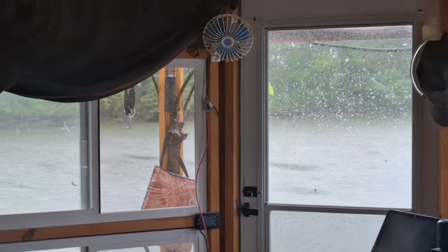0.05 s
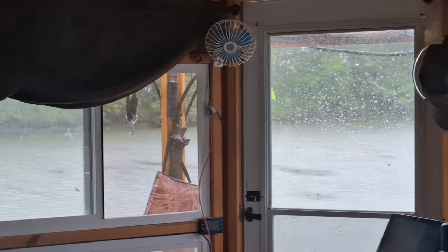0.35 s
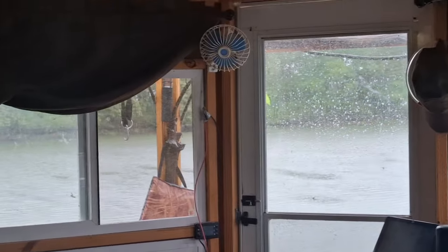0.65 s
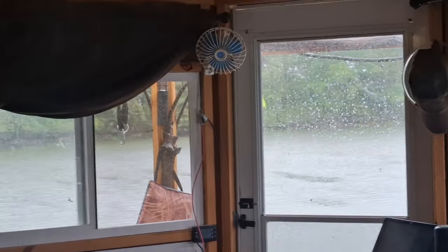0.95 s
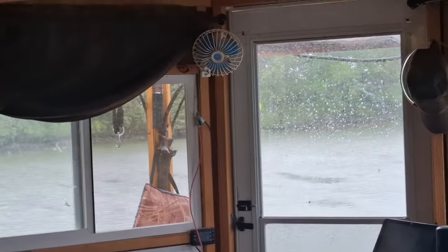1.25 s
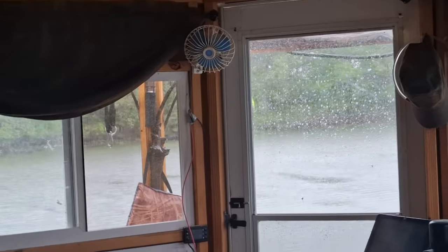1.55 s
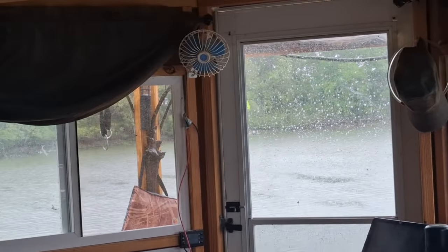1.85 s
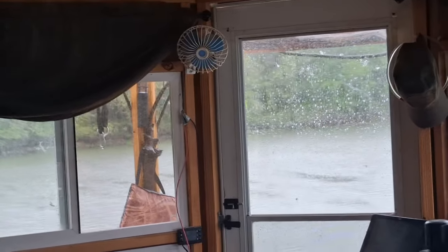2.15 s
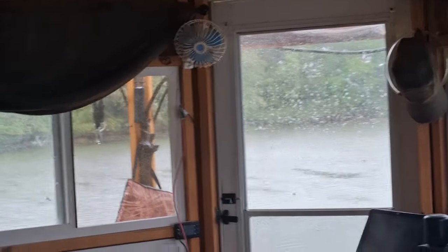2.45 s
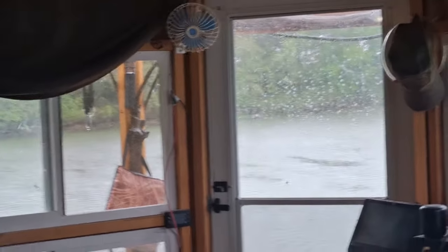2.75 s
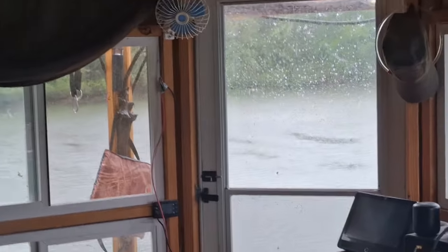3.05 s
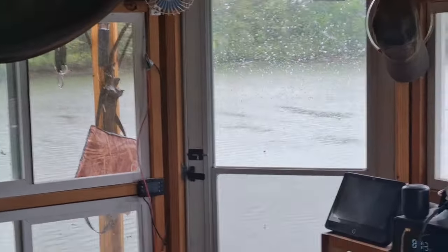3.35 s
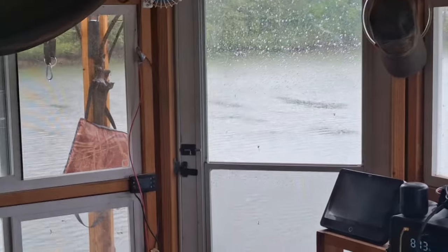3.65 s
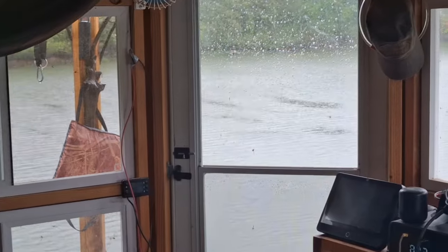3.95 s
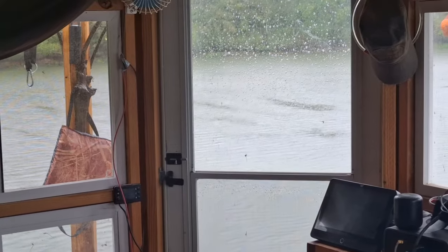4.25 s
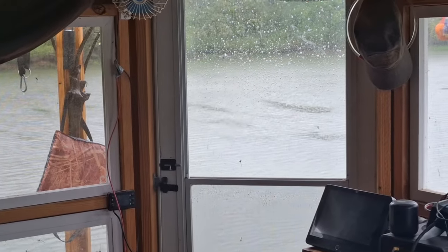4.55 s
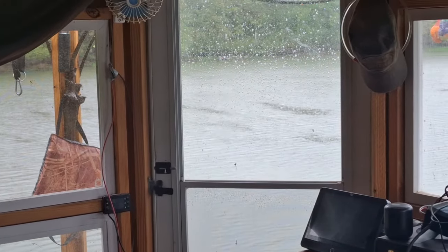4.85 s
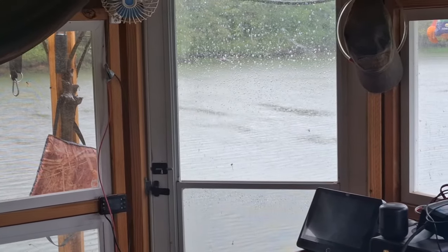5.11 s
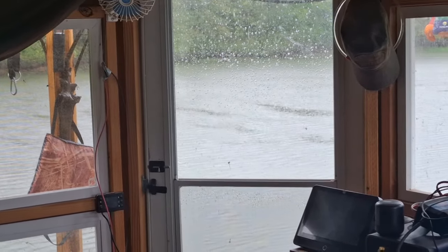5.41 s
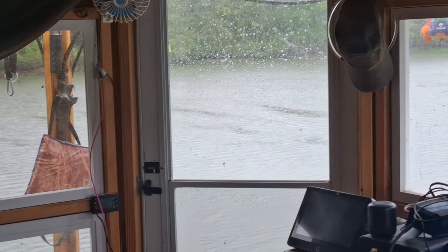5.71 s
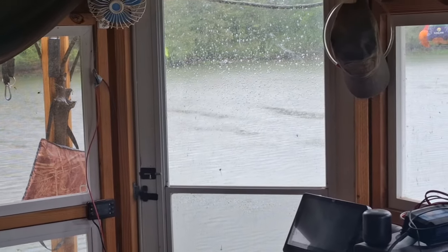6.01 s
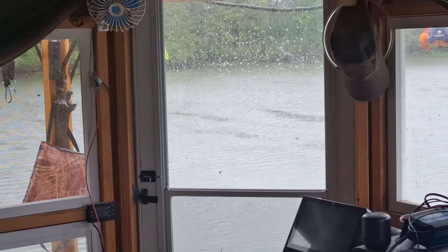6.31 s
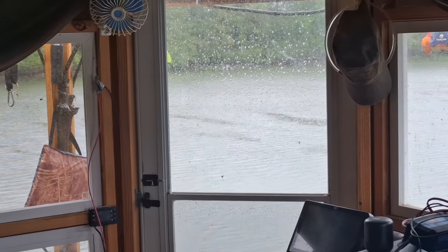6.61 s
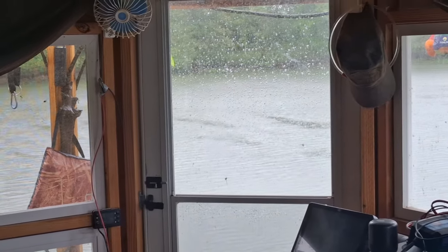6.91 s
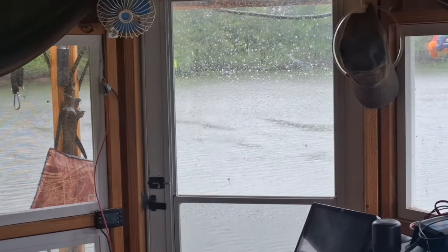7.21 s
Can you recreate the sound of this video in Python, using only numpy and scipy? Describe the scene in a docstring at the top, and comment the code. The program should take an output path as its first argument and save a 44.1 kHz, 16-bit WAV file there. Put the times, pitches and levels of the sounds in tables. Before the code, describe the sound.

A slow engine throbs with a deep, slightly uneven rumble for the whole seven seconds, heard inside a houseboat cabin. Softer, steady rain washes over the roof and ticks on the window panes, briefly stronger at the very start. At about 0.1 seconds a dull, heavy thump lands together with a sharp tap. From 0.6 to 2.8 seconds, light wooden knocks come irregularly, often in loose pairs, with soft low thumps near 1 and 2 seconds. Something slides with a short swish at about 2.6 seconds, followed at once by two more thumps. Another heavy thump with a small knock lands at 3.5 seconds. Then the engine and rain continue with scattered faint ticks. A few weaker thumps come between 6 and 7 seconds, and faint drips plink into the water around 6.5 and 6.9 seconds.

```python
"""A dull thump and light wooden knocks sound over a rumbling engine and rain, inside a houseboat's cabin.
The slow engine shakes the hull with one stroke for each turn of its shaft. Fine rain washes over the
roof, ticks on the panes and plops into the water. For the first three seconds, blows on wood come in
loose pairs and something slides briefly; now and then a heavy, soft blow sets the floor swinging."""
import sys
import numpy as np
from scipy import signal
from scipy.fft import rfft, irfft, next_fast_len
from scipy.io import wavfile
from scipy.ndimage import uniform_filter1d

SR = 44100
rng = np.random.default_rng(int(sys.argv[2]) if len(sys.argv) > 2 else 0)


def dump(signal):
    """Clip the signal to [-1, 1] and save it as 16-bit WAV at the path in sys.argv[1]."""
    limited = np.clip(np.atleast_2d(signal).T, -1, 1)
    pcm = np.round(limited * 32767).astype(np.int16)
    wavfile.write(sys.argv[1], SR, pcm)


N = 320607
TIME = np.arange(N) / SR
HIT_TIME = np.arange(16384) / SR  # seconds since a single hit

# heavy blows on the floor, which also jolt the wood: t/s, level/dB, f/Hz
THUMPS = [(0.105, -12.5, 96.5), (1.021, -20.5, 82.6), (1.956, -17, 80.7), (2.679, -23, 73),
          (2.81, -19, 101.6), (3.528, -12, 111.4), (6.067, -25.5, 87.5), (6.401, -34, 77),
          (6.989, -32, 82.5)]


def from_db(db):
    """Turn decibels into a number to multiply a sound by."""
    return 10 ** (np.asarray(db) / 20)


def curve(table):
    """Join (time, value) points with straight lines."""
    times, values = np.transpose(table)
    return np.interp(TIME, times, values)


def bell(s, half_s):
    """A smooth swell from 0 to 1 and back, centred on time s."""
    return np.exp(-((TIME - s) / half_s) ** 2)


def wander(per_s):
    """A smooth random wobble, roughly 1 in size, made from per_s random steps a second."""
    hold = max(int(SR / per_s), 1)
    steps = np.repeat(rng.standard_normal(N // hold + 1), hold)[:N]
    smooth = uniform_filter1d(uniform_filter1d(steps, hold), hold)
    return smooth / smooth.std()


def colour(x, points):
    """Make some pitches louder and others softer, following (f/Hz, level/dB) points."""
    size = next_fast_len(x.shape[-1], real=True)
    size += size % 2
    hz, db = np.transpose(points)
    bin_hz = np.maximum(np.fft.rfftfreq(size, 1 / SR), 1)
    gain = from_db(np.interp(np.log(bin_hz), np.log(hz), db))
    # let the filter ring only after a hit, never before, so that hits stay sharp
    cepstrum = irfft(np.log(gain))
    cepstrum[1:size // 2] *= 2
    cepstrum[size // 2 + 1:] = 0
    return irfft(rfft(x, size) * np.exp(rfft(cepstrum)))[..., :x.shape[-1]]


def unit(x, size=None):
    """Scale a sound so that the mean of its channels has strength (rms) 1 over the first size samples."""
    return x / np.sqrt(np.mean(x.mean(axis=0)[:size] ** 2))


def add(out, s, sound):
    """Mix a sound in at s seconds."""
    start = max(int(s * SR), 0)
    out[:, start:start + sound.shape[1]] += sound[:, :N - start]


def cabin_noise(size, apart_hz=1300, bass_side_db=-11):
    """Noise from all around: left and right are alike in the bass and differ in the treble."""
    mid, side = rng.standard_normal((2, size))
    side = colour(side, [(apart_hz / 4, bass_side_db), (apart_hz, 0)])
    return np.array([mid + side, mid - side])


def burst(t60, rise_s, cabin_db=-19, cabin_t60=0.42):
    """A hit's noisy ring and the cabin's faint echo; t60 is the seconds it takes to fade by 60 dB."""
    fade = from_db(-60 * HIT_TIME / t60) + from_db(cabin_db - 60 * HIT_TIME / cabin_t60)
    return cabin_noise(len(HIT_TIME)) * fade * (1 - np.exp(-HIT_TIME / rise_s))


def tiny_hits(per_s, spread_db, t60, spots=6):
    """Tiny hits of uneven size land at random times on several spots, each with its own ring."""
    out = 0
    for _ in range(spots):
        when, chance = rng.random((int(per_s * N / SR / spots), 2)).T
        sizes = from_db(spread_db * np.minimum(-np.log(1 - chance), 4))
        hits = np.zeros(N)
        np.add.at(hits, (when * N).astype(int), sizes)
        out = out + signal.oaconvolve(hits[None], burst(t60, rise_s=0.00027), axes=1)[:, :N]
    return unit(out)


def hull():
    """The hull's panels boom unevenly as the engine shakes them."""
    # tone of the boom: f/Hz, level/dB
    boom_colour = [(20, -23), (50, -3), (70, -1), (100, 1.5), (130, -1.5), (175, -4.5), (225, -11.5),
                   (255, -22), (295, -20.5), (340, -34.5), (600, -58.5)]
    # loudness of the boom: t/s, level/dB
    boom_level = [(0, -32), (1.0, -33.5), (1.5, -35), (2.2, -36.5), (4.1, -36), (5.7, -38.5), (6.9, -37.5)]
    return unit(colour(cabin_noise(N), boom_colour)) * from_db(curve(boom_level))


def engine(uneven_db=0.86, sway_db=1.36, waver_db=0.74, jitter_s=.0005, lag_s_per_hz=.00015):
    """A deep hum, and one uneven stroke per shaft turn that spreads through the hull into the cabin."""
    # the idling shaft's drifting turns per second: t/s, f/Hz
    shaft_speed = [(0, 21.9), (.35, 22.5), (.95, 22.4), (1.2, 21.9), (1.6, 22.1), (2.25, 21.35),
                   (2.75, 21.85), (3.55, 22.0), (4.25, 21.4), (4.9, 21.9), (5.35, 22.0), (5.85, 21.6),
                   (7.27, 21.5)]
    # how the cabin rings after a stroke: f/Hz, level/dB
    cabin_colour = [(22, -10), (44, -20), (65, -7), (87, -8), (110, 0), (131, -4), (153, -6), (175, -10.5),
                    (197, -18), (240, -24), (330, -42), (700, -70)]
    # throb of the strokes: t/s, level/dB
    throb_level = [(0, -35), (.9, -31.5), (1.65, -36.5), (2.05, -28.5), (2.6, -33.5), (2.9, -30),
                   (3.35, -31.5), (3.85, -33.5), (4.4, -32.3), (5.3, -35), (5.7, -41), (5.95, -34.5),
                   (6.25, -45.5), (6.5, -33)]
    # hum at twice the shaft speed: t/s, level/dB
    hum_level = [(0, -32), (.35, -34), (.76, -45), (1.0, -35.5), (1.4, -35.5), (1.75, -38), (2.3, -31.5),
                 (3.4, -38), (5.7, -36), (6.25, -38.5), (6.55, -39.5), (7.27, -38)]
    turns = .06 + np.cumsum(curve(shaft_speed)) / SR
    starts = np.flatnonzero(np.diff(np.floor(turns)))
    jitter = (jitter_s * SR * wander(22)[starts]).astype(int)
    starts = np.clip(starts + jitter, 0, N - 1)
    strokes = np.zeros((1, N))
    strokes[0, starts] = -from_db(uneven_db * wander(22) + sway_db * wander(2.89))[starts]
    ringing = colour(strokes - strokes.mean(), cabin_colour)
    # higher notes arrive later, so each stroke sweeps upward
    size = next_fast_len(N + SR, real=True)
    hz = np.fft.rfftfreq(size, 1 / SR)
    delay = np.exp(-1j * np.pi * lag_s_per_hz * hz ** 2)
    swept = irfft(rfft(ringing, size) * delay, size)[:, :N]
    throb = unit(swept) * from_db(curve(throb_level))
    hum_gain = from_db(curve(hum_level) + waver_db * wander(4.1))
    hum = -np.sqrt(2) * np.sin(4 * np.pi * turns) * hum_gain
    # left and right hear the engine slightly out of step
    shift_radians = np.array([[0.42], [-0.42]])
    rumble = signal.hilbert(throb + hum, size)[:, :N]
    return np.real(rumble * np.exp(1j * shift_radians))


def drips(per_s=240, low_hz=850, high_hz=2400, spread_db=3.0, t60=0.097):
    """Countless small plops on the water around the boat, each at its own pitch, blend together."""
    out = np.zeros((2, N))
    t = HIT_TIME[:3000]
    for when, pitch, size, place in rng.random((int(per_s * N / SR), 4)):
        hz = low_hz * (high_hz / low_hz) ** pitch
        phase = 2 * np.pi * (hz * t + place * np.array([[0], [1]]))
        db = spread_db * min(-np.log(1 - size), 2) - 60 * t / t60
        gain = np.sqrt(low_hz / hz) * from_db(db)  # smaller bubbles ring higher and softer
        rise = np.minimum(t * hz / 2, 1)
        add(out, when * N / SR, gain * np.sin(phase) * rise)
    return unit(out)


def rain(wash_db=-47, glass_db=-55.5, flutter_db=1.12, spray_db=-3, patter_db=-4.5, drips_db=-11.5):
    """Drops blur into a wash on the roof and the water; fine spray and separate drops hit the glass."""
    # tone of rain on the roof: f/Hz, level/dB
    roof_colour = [(150, -2.5), (290, 6), (390, -2.5), (475, 8), (560, 0.5), (780, -2.5), (1050, -3.5),
                   (1400, -10), (1900, -7.5), (3400, -16), (4800, -15), (15500, -53)]
    # tone of rain on the panes: f/Hz, level/dB
    pane_colour = [(400, -9), (1500, 8.5), (3000, 9), (4800, 0.5), (7700, 3), (15500, 1.5)]
    # gusts and lulls: t/s, half length/s, level change/dB
    gusts = [(0, 0.15, 6.5), (0.365, 0.15, -2), (1.175, 0.21, 1.5), (2.22, 1, 2)]
    roof = unit(colour(tiny_hits(per_s=700, spread_db=1.5, t60=0.089), roof_colour))
    spray = unit(colour(cabin_noise(N), pane_colour)) * from_db(1.3 * wander(16))
    patter = unit(colour(tiny_hits(per_s=220, spread_db=4.0, t60=.03), pane_colour))
    glass = from_db(spray_db) * spray + from_db(patter_db) * patter
    wash = roof + from_db(drips_db) * drips()
    gust_db = sum(db * bell(s, half_s) for s, half_s, db in gusts)
    wash *= from_db(wash_db + gust_db + flutter_db * wander(5.8))
    glass *= from_db(glass_db + 1.16 * gust_db)  # gusts count a little more on the glass
    return wash + glass


def plinks(t60=.085, splash_db=-3):
    """A heavier drip makes one bubble ring, with a small splash around it."""
    # drips into the water: t/s, level/dB, f/Hz
    heavy_drips = [(4.05, -52, 1370), (6.53, -51, 1546), (6.57, -49, 1040), (6.924, -46.5, 1338),
                   (6.935, -48, 1535)]
    out = np.zeros((2, N))
    for s, db, hz in heavy_drips:
        phase = 2 * np.pi * hz * HIT_TIME + rng.uniform(-1.1, 1, (2, 1))
        bubble = np.sin(phase) * from_db(-60 * HIT_TIME / t60)
        splash = colour(burst(t60, rise_s=.0005), [(hz / 2, -20), (hz, 0), (2 * hz, -20)])
        plink = unit(bubble, size=450) + from_db(splash_db) * unit(splash, size=450)
        add(out, s, from_db(db) * plink)
    return out


def taps(longest_t60=0.14, spill_db=-32):
    """Each short tap rings in its own band of pitches; the wider the band, the sooner it dies."""
    # the clearest drops and taps, plus the low ring of the wood under a heavy knock and a thump (near 380, 840
    # and 410 Hz): t/s, level/dB, centre f/Hz, width/octaves
    clear_taps = [(0.1, -28, 4200, 17), (.101, -47, 3880, 0.26), (.183, -50, 3400, 0.84),
                  (0.46, -39.5, 3930, 0.54), (.464, -46, 11100, 1.1), (.591, -34.5, 384, 0.23),
                  (.593, -34, 840, 0.22), (.61, -57, 7370, 0.036), (.856, -42, 2130, 0.15),
                  (0.903, -46, 2460, 0.58), (1.164, -42.5, 13000, 0.57), (1.202, -50, 4640, 0.35),
                  (1.373, -50, 9000, 1.4), (1.838, -46.5, 5570, 0.53), (1.961, -54, 4200, 0.084),
                  (2.452, -47.5, 12900, 1.3), (2.816, -54, 4380, 0.17), (2.928, -48, 8000, 2),
                  (3.53, -36.5, 410, 0.35), (3.532, -48, 10100, 3.9), (3.735, -49.5, 2700, 0.58),
                  (4.116, -50, 5080, 0.1), (5.389, -49.5, 6700, 0.54), (5.495, -47.5, 4060, 0.52),
                  (6.805, -53.5, 6800, 0.44), (6.874, -49.5, 3770, 0.68), (7.005, -48.5, 12000, 1.8)]
    out = np.zeros((2, N))
    hz = np.geomspace(100, 16000, num=300)
    for s, db, centre_hz, octaves in clear_taps:
        t60 = longest_t60 / (1 + octaves / 13)
        band = np.exp(-.5 * (np.log2(hz / centre_hz) / octaves) ** 2)
        spill = from_db(spill_db) / (1 + hz / centre_hz)  # a little sound outside the band
        tap_colour = np.transpose([hz, 20 * np.log10(band + spill)])
        tap = colour(burst(t60, rise_s=0.022 * t60, cabin_db=-25), tap_colour)
        add(out, s, from_db(db) * unit(tap, size=450))
    return out


def slide(peak_s=2.618, peak_db=-31.5, swell_s=0.082, stop_s=0.038):
    """Something slides: many tiny slips swell into a short swish."""
    # tone of the swish: f/Hz, level/dB
    swish_colour = [(250, 3.5), (600, 4), (1400, -3), (2100, 1.5), (3300, -2.5), (4800, -8), (9500, -18),
                    (15500, -16)]
    slips = tiny_hits(per_s=2600, spread_db=-0.5, t60=0.016, spots=3)
    swell = bell(peak_s, np.where(TIME < peak_s, swell_s, stop_s))
    return unit(colour(slips, swish_colour)) * from_db(peak_db) * swell


def thumps(push_s=0.0089):
    """Soft, heavy blows push the floor down and set it swinging at a few low notes."""
    # the floor's own notes: multiple of the thump's pitch, level/dB, t60/s
    floor_notes = [(.74, 5, 0.14), (0.998, 4.5, 0.17), (1.22, -8, 0.06), (1.52, 3, 0.11), (1.95, -9, 0.2)]
    out = np.zeros((2, N))
    push = 1 - np.exp(-HIT_TIME / push_s)
    for s, db, hz in THUMPS:
        swing = np.zeros((1, len(HIT_TIME)))
        for ratio, note_db, t60 in floor_notes:
            swing -= from_db(note_db - 60 * HIT_TIME / t60) * np.sin(2 * np.pi * hz * ratio * HIT_TIME)
        add(out, s, from_db(db) * swing * push)
    return out


def knocks(notes_db=-4, body_db=-4, crack_db=-17, bounce_db=-14, spot_db=3.2, spot_detune=.01):
    """Each blow cracks against a new spot on the wood, makes the wood ring and bounces once."""
    # blows on the wood: t/s, level/dB, brightness/(dB per octave)
    blows = [(.06, -33.5, -9.5), (.101, -31.5, -4), (.582, -25.5, -3), (.592, -28.5, -4.5), (.706, -30, -2),
             (.753, -32.5, -2), (.838, -29.5, -1), (1.079, -31, -2), (1.174, -28, -1.5), (1.399, -36, -5.5),
             (1.443, -31, -2), (1.472, -34.5, -4), (1.711, -28, -3), (1.769, -28.5, -6), (1.807, -38, -4.5),
             (1.960, -30.5, -1), (1.988, -32, -5), (2.177, -29.5, -3.5), (2.251, -27.5, -2.5),
             (2.394, -30, -4), (2.436, -32, -4.5), (2.474, -33.5, -4), (2.516, -30, -4.5),
             (2.772, -32, -1.5), (2.779, -30.5, -4.5)]
    # the wood's own clear notes: f/Hz, width/Hz (wider dies sooner), level/dB
    wood_notes = [(329, 16, -6), (362, 16, -3), (441, 16, 1.5), (538, 13, 6), (672, 24, 3), (812, 26, 3),
                  (868, 32, 3.5), (1090, 30, 2), (1224, 36, 0.5), (1340, 44, -1), (1590, 44, 4),
                  (1678, 44, 3.5), (2300, 45, -2)]
    # its many other notes, blurred into a noisy body: f/Hz, level/dB
    body_colour = [(120, -7.5), (400, 4), (850, 3), (970, -3.5), (1150, -0.5), (1650, -0.5), (1900, -12.5),
                   (2500, -5), (3300, -20.5), (4700, -22), (6000, -27), (15000, -49)]
    # crack of the contact: f/Hz, level/dB
    crack_colour = [(900, -22), (2700, 3), (4200, -8), (6000, -13), (15000, -18)]
    # each thump gives the wood a softer, dull jolt just before the floor swings
    jolts = [(s - 0.00587, db - 24, -6) for s, db, _ in THUMPS]
    out = np.zeros((2, N))
    hz, width_hz, db = np.array(wood_notes).T[:, :, None]
    for s, level_db, brightness in blows + jolts:
        # from spot to spot the notes differ in level and pitch
        weight, detune, lag, sign = rng.standard_normal((4, len(hz), 1))
        fade = np.sign(sign) * from_db(db + spot_db * weight) * np.exp(-np.pi * width_hz * HIT_TIME)
        phase = 2 * np.pi * hz * (1 + spot_detune * detune) * HIT_TIME
        notes = np.array([(fade * np.sin(phase + side * 0.3 * lag)).sum(axis=0) for side in (1, -1)])
        body = colour(burst(t60=0.145, rise_s=.0013), body_colour)
        crack = colour(burst(t60=.045, rise_s=.0008, cabin_db=-26), crack_colour)
        parts = ((notes_db, notes), (body_db, body), (crack_db, crack))
        knock = sum(from_db(part_db) * unit(part, size=900) for part_db, part in parts)
        knock = colour(knock, [(350, -brightness), (2800, 2 * brightness)])  # harder contact is brighter
        add(out, s, from_db(level_db) * knock)
        add(out, s + rng.uniform(0.0064, 0.036), from_db(level_db + bounce_db) * knock)
    return out


def scene():
    """Everything that sounds in the cabin."""
    return engine() + hull() + rain() + knocks() + taps() + plinks() + thumps() + slide()


def record(dry, low_cut_hz=14, top_hz=15950):
    """The microphone gives each side its own tone and cuts the deepest bass and the highest treble."""
    # the microphone's tone, with two dips in the treble: f/Hz, level/dB
    mic_colour = [(3000, 0), (4600, 2), (6100, -2.5), (7800, 0), (9500, -4), (12000, 1)]
    # how much louder its left opening hears than its right: f/Hz, level/dB
    left_over_right = [(45, 5), (110, 0.5), (200, -1.5), (380, 1), (700, -0.5), (1290, 1), (2380, 1.5),
                       (4400, 6), (8120, 1.5), (15000, -2.5)]
    left, right = colour(dry, mic_colour)
    left = colour(left, [(hz, db / 2) for hz, db in left_over_right])
    right = colour(right, [(hz, -db / 2) for hz, db in left_over_right])
    bass_cut = signal.butter(1, low_cut_hz, "high", fs=SR, output="sos")
    treble_cut = signal.ellip(10, .2, 80, top_hz, fs=SR, output="sos")
    return signal.sosfilt(treble_cut, signal.sosfilt(bass_cut, np.array([left, right])))


dry = scene()
out = record(dry)
dump(out)
```